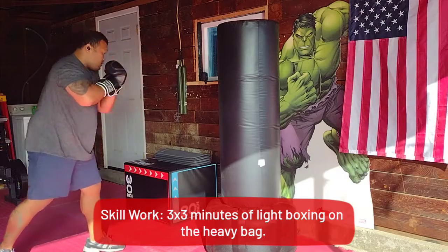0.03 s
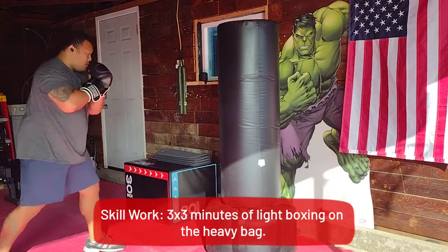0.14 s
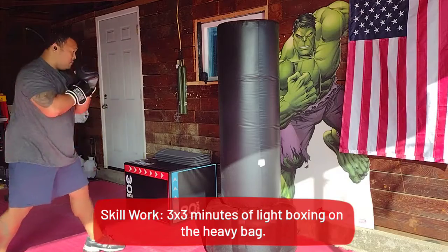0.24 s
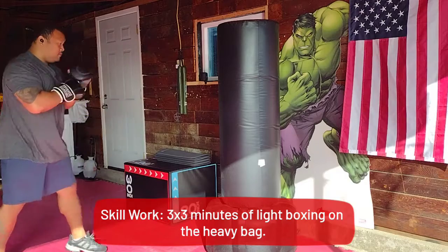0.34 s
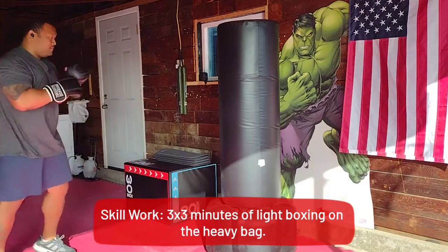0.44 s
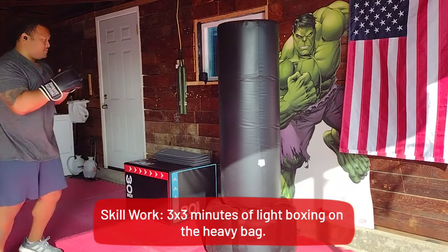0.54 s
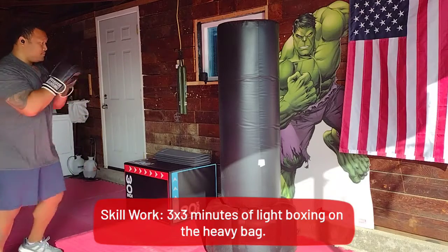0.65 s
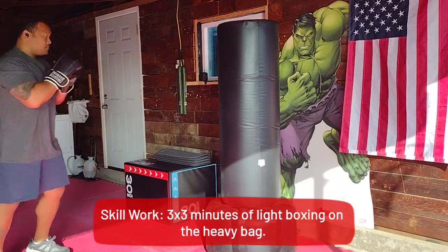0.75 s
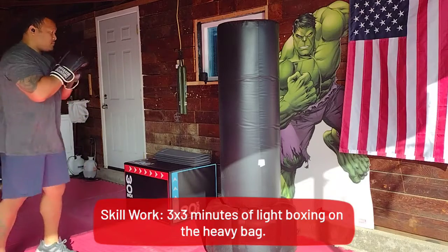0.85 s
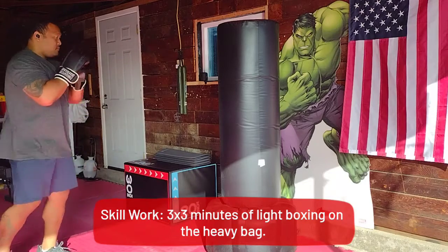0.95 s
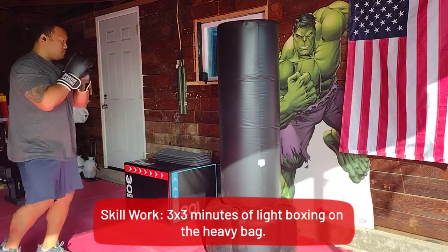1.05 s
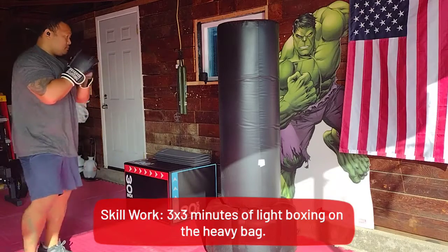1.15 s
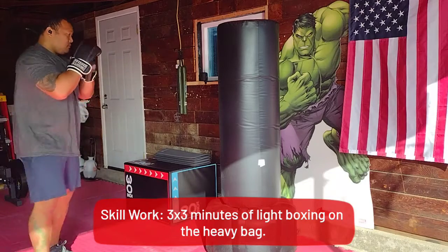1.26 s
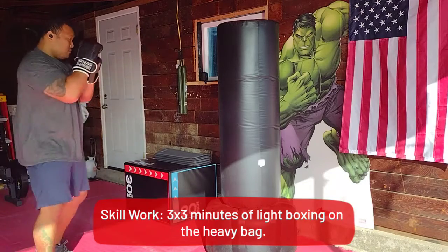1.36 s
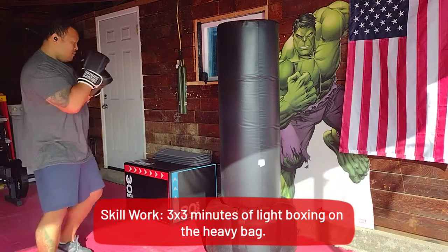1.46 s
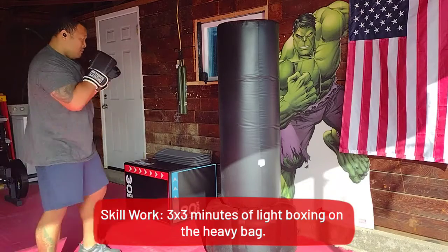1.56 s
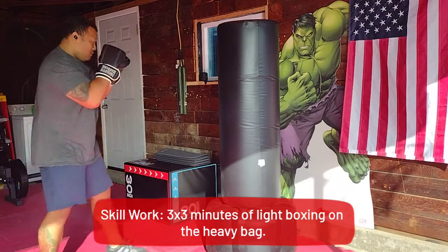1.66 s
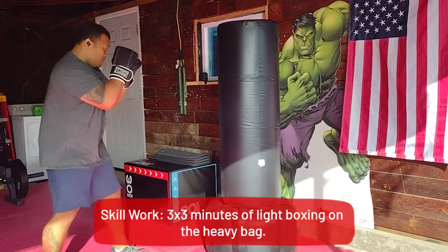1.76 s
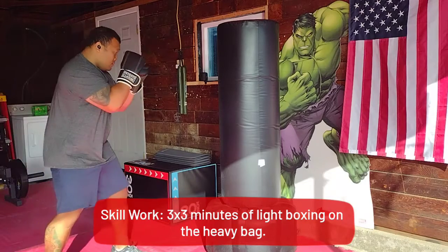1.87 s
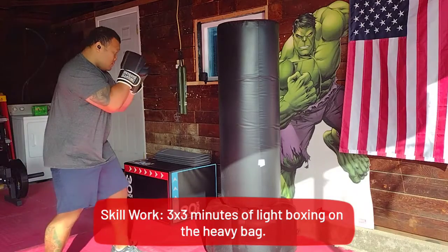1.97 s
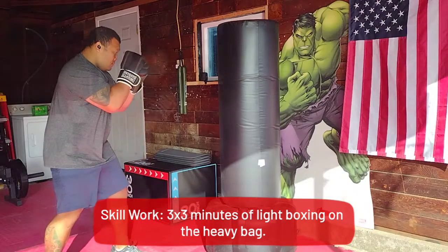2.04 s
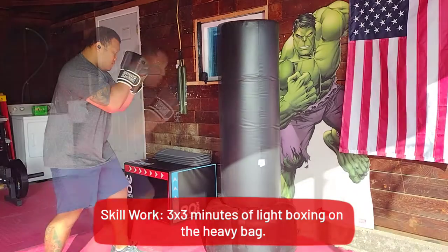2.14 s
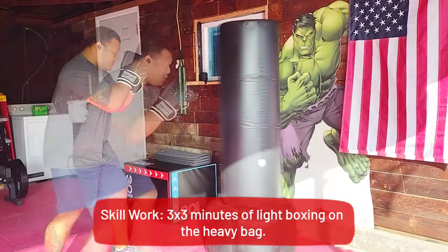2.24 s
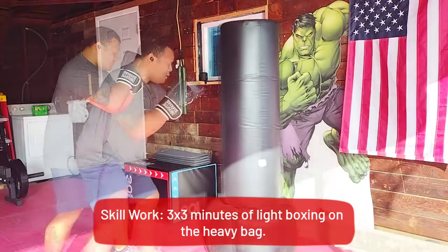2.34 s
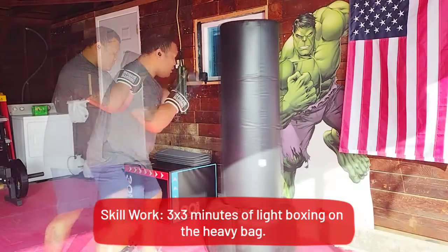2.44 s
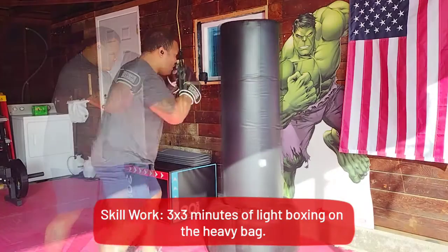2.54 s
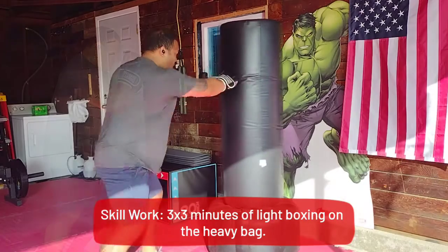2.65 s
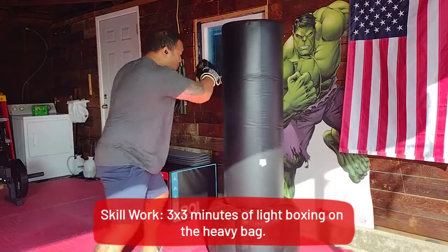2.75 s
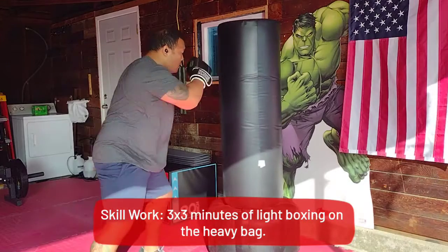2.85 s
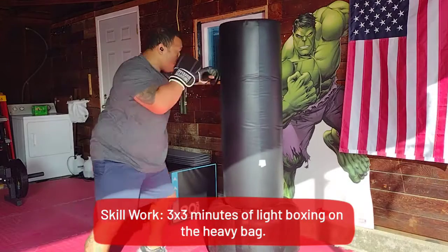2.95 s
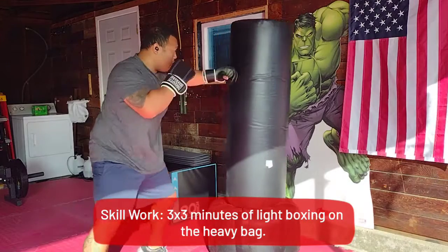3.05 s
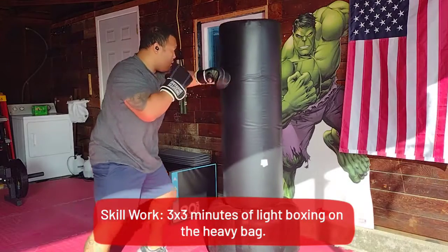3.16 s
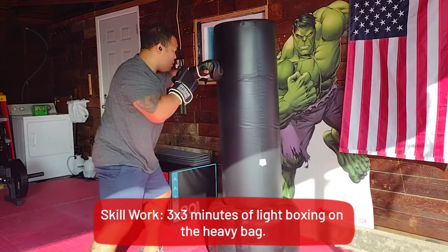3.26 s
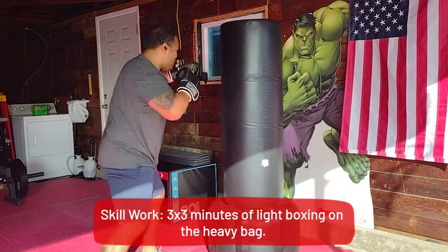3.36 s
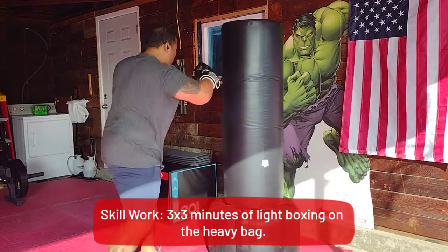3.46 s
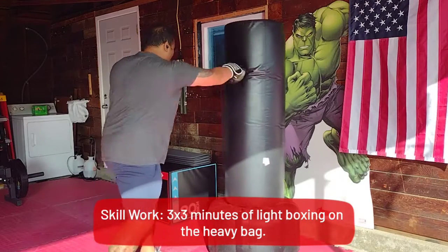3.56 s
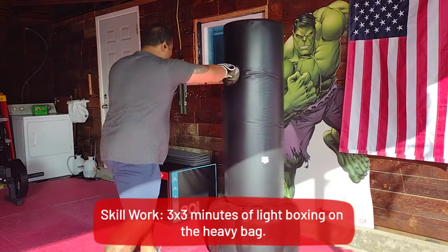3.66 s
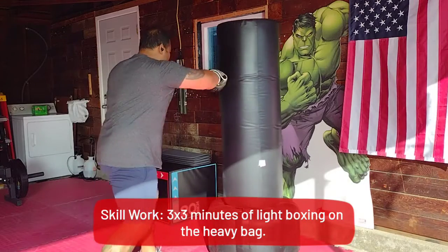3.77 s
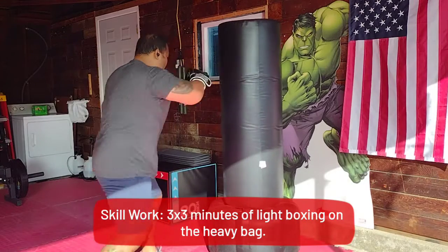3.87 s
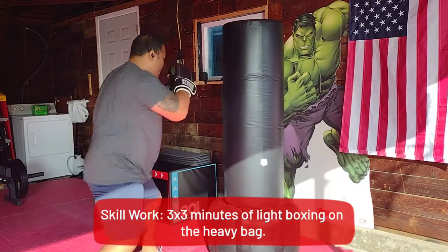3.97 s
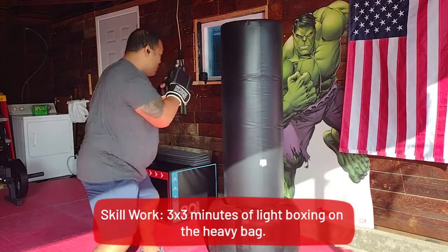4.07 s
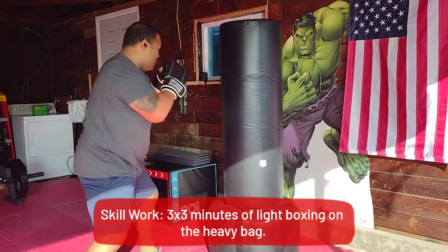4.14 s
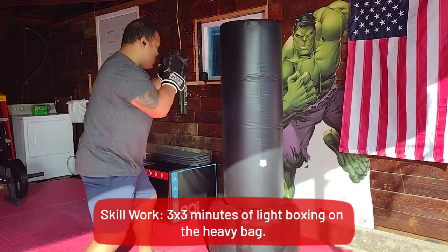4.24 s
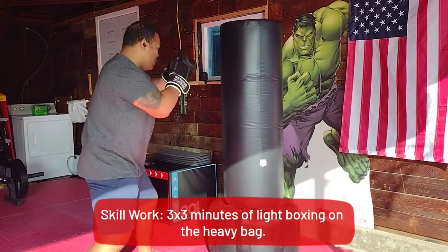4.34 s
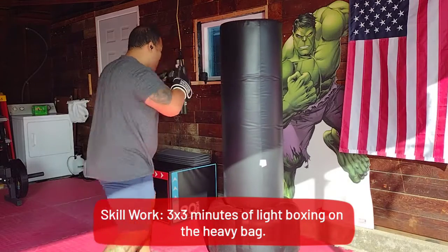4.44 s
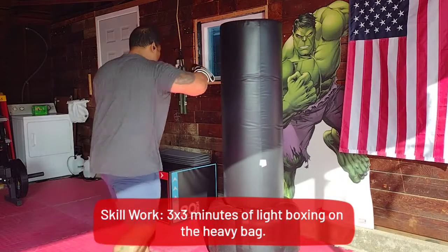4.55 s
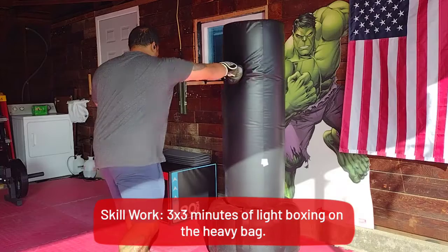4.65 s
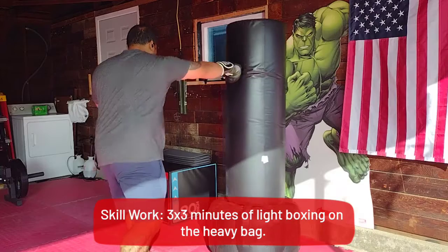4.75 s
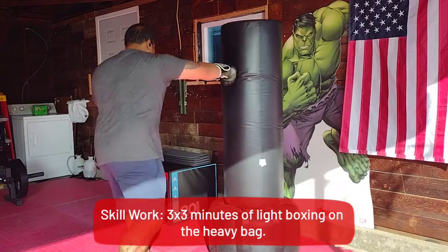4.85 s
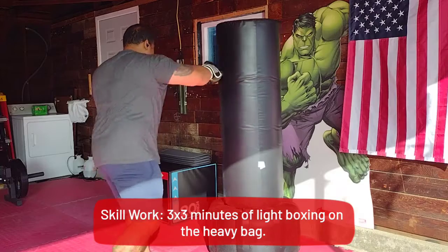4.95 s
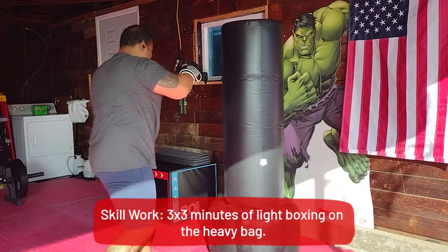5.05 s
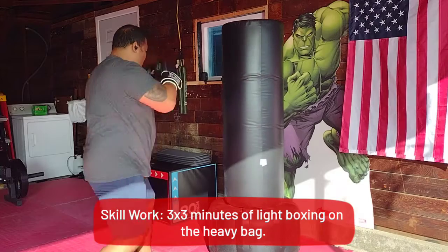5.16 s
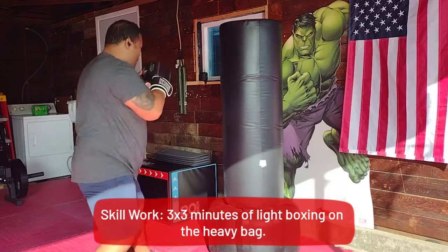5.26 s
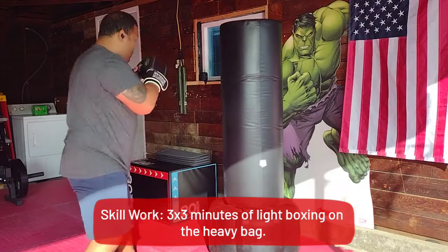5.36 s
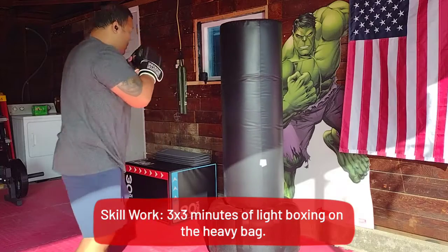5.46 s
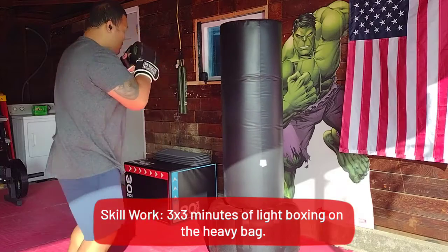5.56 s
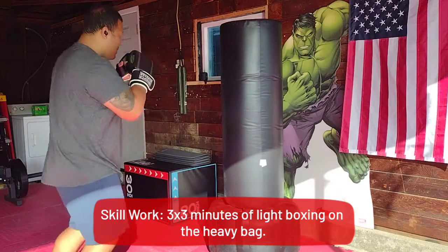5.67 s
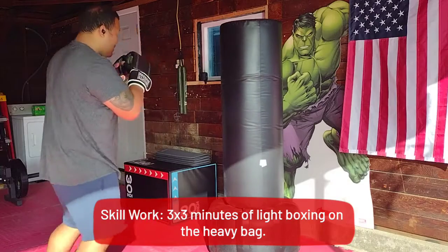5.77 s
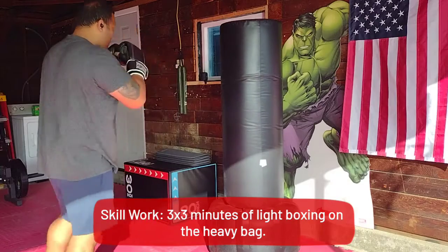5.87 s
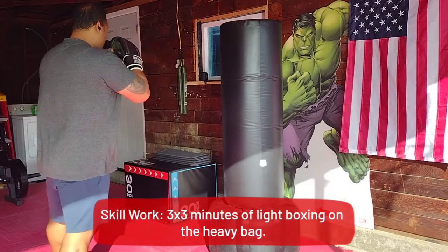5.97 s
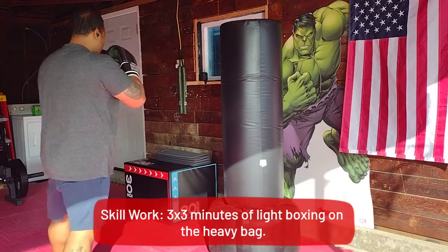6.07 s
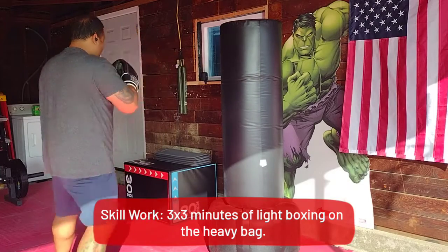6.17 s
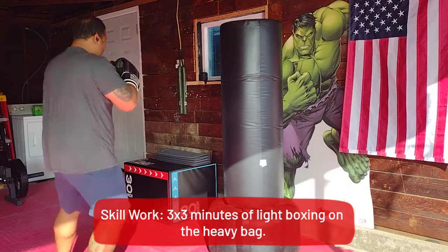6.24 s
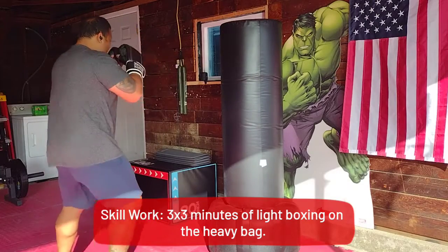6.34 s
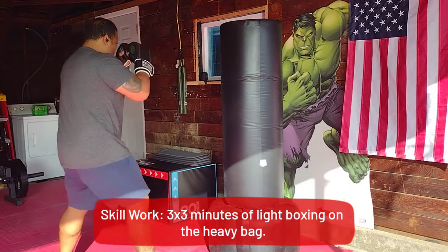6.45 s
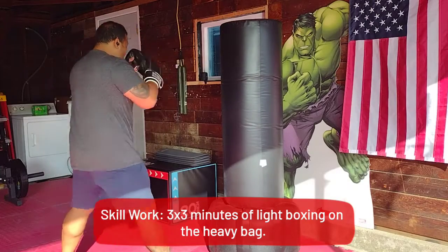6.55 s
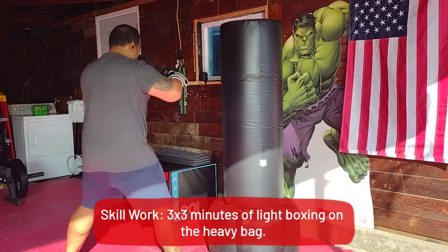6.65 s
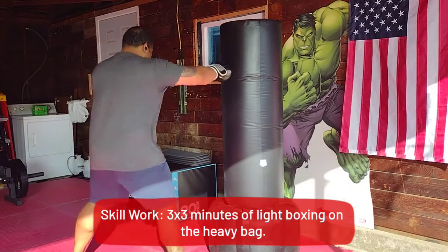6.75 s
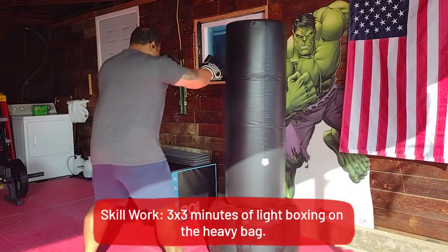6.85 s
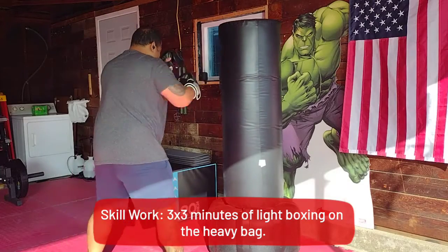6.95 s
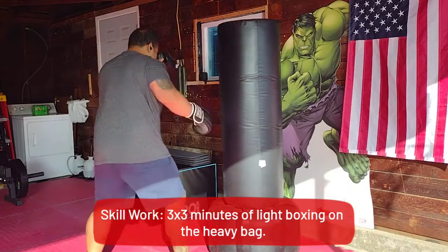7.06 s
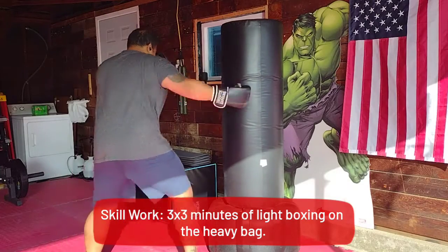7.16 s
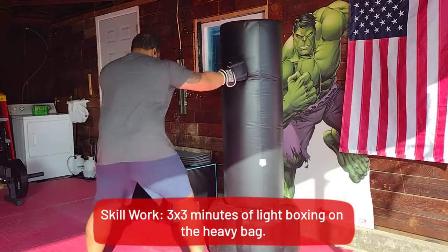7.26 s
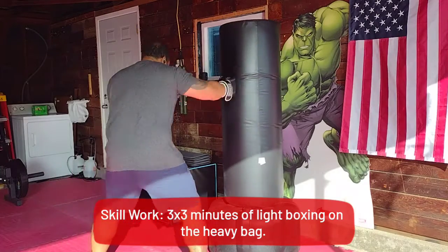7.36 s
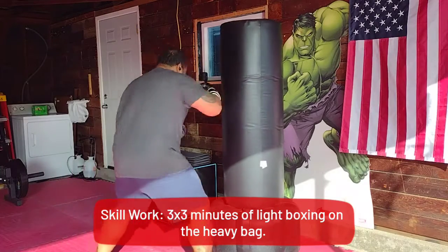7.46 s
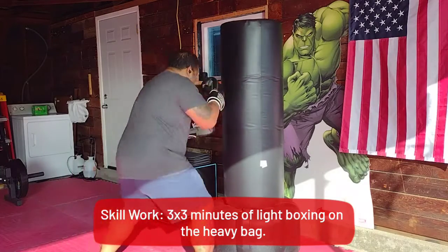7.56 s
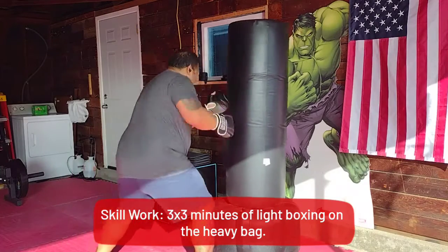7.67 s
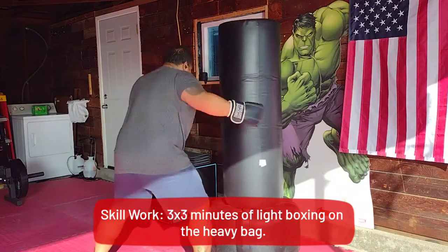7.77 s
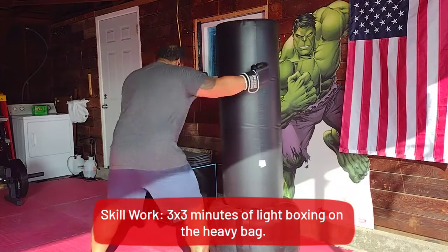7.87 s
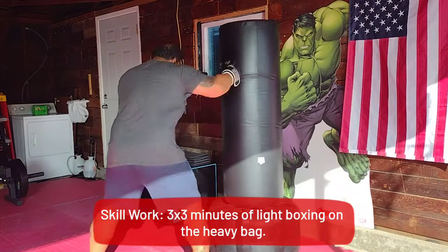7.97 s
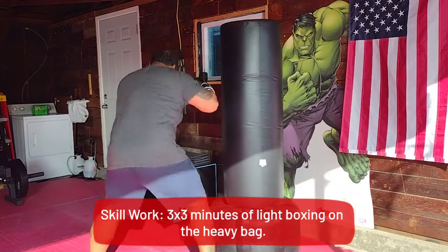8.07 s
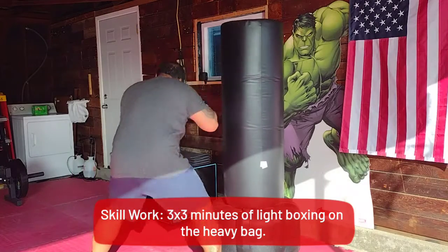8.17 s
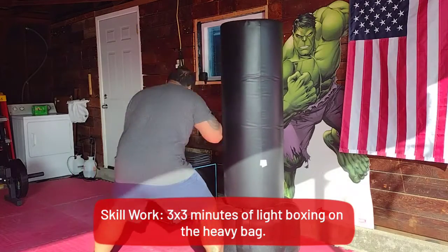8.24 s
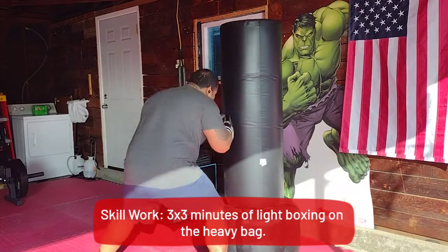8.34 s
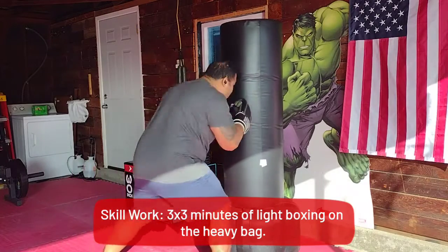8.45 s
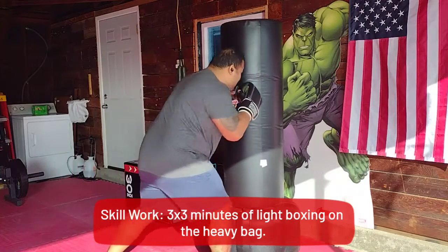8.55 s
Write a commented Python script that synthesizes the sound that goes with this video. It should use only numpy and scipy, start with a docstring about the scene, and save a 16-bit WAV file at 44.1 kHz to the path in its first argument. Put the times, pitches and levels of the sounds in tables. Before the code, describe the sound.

In a brick garage with an open door, a car fades off and small birds chirp faintly over low traffic while shoes scuff softly. A base knock comes at two seconds, then gloved punches thud on a heavy bag in loose bursts, each followed by hollow rocking knocks and small clicks. After a lull, a final flurry peaks in one heavy blow. Stereo microphone a few metres away, with short hard room reflections.

```python
"""A brick garage: gloved punches land on a free-standing heavy bag, slapping its vinyl skin and thudding
in the filling. Its plastic base rocks and knocks on the floor, and short bright clicks mark some floor
contacts. Each blow, knock or step is one impact and a chatter of small jolts through body resonances,
then the room. Shoes step and scuff on the mat (grainy noise), small birds call outside (gliding tones),
and far traffic and a car driving off (shaped noise) come through the open door."""
import sys
import numpy as np
from scipy import signal
from scipy.fft import rfft, irfft, next_fast_len
from scipy.io import wavfile
from scipy.ndimage import map_coordinates

SR = 44100
rng = np.random.default_rng(int(sys.argv[2]) if len(sys.argv) > 2 else 0)


def gain_from_db(level_db):
    """Convert decibel levels to linear amplitude factors (20 dB per decade)."""
    decades = np.asarray(level_db, float) / 20
    return 10 ** decades


def wav_out(sig):
    """Save sig, one row per channel (or a flat mono array), as 16-bit PCM at SR to the path in sys.argv[1]."""
    wavfile.write(sys.argv[1], SR, np.round(np.clip(np.atleast_2d(sig).T, -1, 1) * 32767).astype(np.int16))


N = 379701

# spectrum of the street's rush, near car included: (f/Hz, relative level per Hz/dB)
RUSH_SPECTRUM = [(200, -17), (320, 8), (450, 2.5), (1000, -0.5), (1400, -1.5), (2400, -5), (3200, -6.5),
                 (7500, -13.5), (9000, -25), (15500, -39)]
# delay of the direct sound at the left microphone, in samples; negative delays the right one
GLOVE_LAG, BASE_LAG, FEET_LAG = 1, 0, -3


def punches():
    """Gloves hit the bag: a hard impact thuds in the filling and snaps the vinyl skin."""
    # glove on bag: (t/s, thud level/dB, clack level/dB, slap level/dB, shake length/s)
    hits = [(2.828, -40.5, -54, -54, 0.14), (3.181, -41.5, -49.5, -48.5, 0.16),
            (3.723, -29.5, -45, -44, 0.1), (4.832, -34, -45, -49, 0.092), (6.966, -41, -51, -51.5, 0.15),
            (7.448, -42.5, -48, -55.5, 0.1), (7.81, -34.5, -48.5, -54, 0.11),
            (8.127, -19, -28, -45.5, 0.0082)]
    cavity_hz = 900  # the hollow that colours the clack of a glove
    contacts = [(*row, cavity_hz) for row in hits]
    return blows(contacts, cavity_db=-28.5, swell=0.00013, impact=1.2, rattle=350,
                 snap_db=12.0, wet_db=-0.5, lag=GLOVE_LAG)


def knocks():
    """Mostly the base on the floor: a hollow pitch speaks over the clack, with hardly any snap."""
    # mostly base on floor, with a few late slaps and a scuff:
    # (t/s, thud level/dB, clack level/dB, shake length/s, clack pitch f/Hz)
    contacts = [(1.973, -39, -45.5, 0.03, 396), (1.981, -33, -50, 0.076, 1480),
                (2.021, -36.5, -51.5, 0.054, 1160), (2.114, -59, -63.5, 0.18, 580),
                (2.999, -55.5, -66.5, 0.12, 1180), (3.228, -42, -51, 0.14, 606),
                (3.344, -29.5, -50, 0.043, 1160), (3.381, -34, -48, 0.042, 1160),
                (3.866, -42, -54.5, 0.019, 880), (3.916, -32.5, -45, 0.051, 1290),
                (3.958, -36.5, -48, 0.059, 1000), (4.119, -43, -55.5, 0.081, 1190),
                (4.886, -37.5, -53.5, 0.056, 595), (5.052, -41.5, -50.5, 0.037, 1300),
                (5.088, -33.5, -44.5, 0.056, 795), (5.187, -47.5, -56.5, 0.11, 1050),
                (5.263, -43.5, -60, 0.077, 990), (5.373, -51, -62, 0.12, 875),
                (7.126, -49, -58.5, 0.093, 900), (7.493, -40, -54, 0.05, 730),
                (7.515, -39.5, -44, 0.012, 1050), (7.551, -46.5, -55.5, 0.12, 900),
                (7.633, -38, -49.5, 0.073, 1080), (7.956, -50, -58.5, 0.099, 1360),
                (7.983, -35.5, -50.5, 0.079, 610), (8.158, -34, -47.5, 0.044, 650),
                (8.232, -41.5, -95, 0.087, 600), (8.275, -39.5, -55.5, 0.035, 1280),
                (8.31, -35, -50, 0.078, 780), (8.385, -40.5, -48.5, 0.038, 714)]
    return blows(with_rustle(contacts), cavity_db=8, swell=0.0013, impact=0.96, rattle=350,
                 snap_db=-12, wet_db=3.05, lag=BASE_LAG)


def ticks():
    """Short bright clicks at the onset of some floor contacts, base or foot: decaying noise bursts."""
    # clicks: (t/s, level/dB)
    clicks = [(3.874, -51), (3.959, -42.5), (4.419, -49), (5.184, -40), (5.376, -44.5), (7.634, -33.5),
              (8.31, -34.5)]
    decay_s, centre_hz, width_hz = 0.0071, 2560, 4000  # the decay is a t60
    out = np.zeros((2, N + SR))
    t = np.arange(SR // 20) / SR
    click_ring = resonances([(centre_hz, width_hz, 0)])
    for s, db in clicks:
        burst = gain_from_db(db - 60 * t / decay_s) * rng.standard_normal(len(t))
        tick = filtered(burst, lambda f: click_ring(f) ** 2)
        add_at(out, s, garage(tick, wet_db=6.5, lag=BASE_LAG))
    return out[:, :N]


def steps():
    """Feet land on the mat: a softer impact, a slower swell and a denser chatter."""
    # feet on mat: (t/s, thud level/dB, clack level/dB, shake length/s, clack pitch f/Hz)
    footfalls = [(0.202, -70, -69, 0.11, 603), (0.302, -63.5, -65, 0.078, 560),
                 (2.452, -51.5, -58.5, 0.043, 905), (4.42, -44, -60, 0.029, 900),
                 (4.439, -50, -56.5, 0.059, 1630), (4.725, -58, -68, 0.018, 1210),
                 (5.539, -49.5, -61.5, 0.038, 594), (5.574, -55.5, -62, 0.082, 1210),
                 (6.829, -51, -57.5, 0.023, 1230)]
    return blows(with_rustle(footfalls), cavity_db=8, swell=0.0023, impact=0.43, rattle=940,
                 snap_db=-12, wet_db=0.5, lag=FEET_LAG)


def scuffs():
    """Soles drag on the mat: a grainy hiss rises and falls with each stroke."""
    # shoe strokes: (t/s, length/s, level/dB)
    strokes = [(0.488, 0.2, -63.5), (0.579, 0.3, -61.5), (1.064, 0.26, -66.5), (1.347, 0.1, -67),
               (1.45, 0.092, -64), (2.092, 0.077, -55), (2.228, 0.13, -59), (2.446, 0.065, -58.5),
               (4.264, 0.12, -61), (5.065, 0.058, -55.5), (5.546, 0.047, -59), (5.775, 0.18, -58),
               (6.442, 0.03, -66.5), (6.754, 0.02, -62), (7.492, 0.1, -56), (8.14, 0.03, -45),
               (8.488, 0.054, -64.5)]
    # rubber on foam: (f/Hz, relative level per Hz/dB)
    sole = [(600, 8.5), (1500, 1), (2500, 0.5), (4000, -1), (6700, 3), (8700, -3.5), (15500, -17.5)]
    t = np.arange(N) / SR
    drag = np.zeros(N)
    for s, length, db in strokes:
        progress = np.clip((t - s) / length, 0, 1)
        drag += gain_from_db(db) * np.sin(np.pi * progress) ** 1.93
    grain = gain_from_db(0.95 * wobble(400) + 2.6 * wobble(40))
    hiss = unit(grain * tinted(sole, N))
    return garage(drag * hiss, wet_db=3.0, lag=FEET_LAG)[:, :N]


def birds():
    """Far notes blurred by a fast pitch wobble, and a clearer bird with less blur and less room."""
    # blurred notes: (t/s, length/s, first f/Hz, last f/Hz, level/dB)
    calls = [(0.945, 0.09, 5000, 2900, -66), (1.103, 0.038, 5550, 4230, -64), (1.136, 0.1, 4050, 4000, -61),
             (1.7, 0.036, 4400, 3400, -66), (1.855, 0.04, 5360, 4550, -64.5),
             (1.883, 0.062, 3970, 3440, -65)]
    # clearer notes: (t/s, length/s, first f/Hz, last f/Hz, level/dB)
    whistles = [(6.055, 0.089, 3930, 3856, -70), (6.16, 0.106, 3940, 3760, -68)]
    far = garage(bird_notes(calls, blur_hz=650), wet_db=5.0, lag=FEET_LAG)
    clear = garage(bird_notes(whistles, blur_hz=40), wet_db=-8, lag=FEET_LAG)
    return (far + clear)[:, :N]


def bird_notes(notes, blur_hz):
    """Gliding sines: each starts at once and fades, its pitch wandering by about blur_hz at most."""
    out = np.zeros(N)
    for s, length, first_hz, last_hz, db in notes:
        t = np.arange(round(length * SR)) / SR
        glide = first_hz + (last_hz - first_hz) * t / length
        pitch = glide + blur_hz * np.tanh(wobble(431, size=len(t)))
        swell = np.sin(np.pi * t / length) ** 0.13 * (1 - t / length)
        add_at(out, s, gain_from_db(db) * swell * np.sin(2 * np.pi * np.cumsum(pitch) / SR))
    return out


def street():
    """Far traffic: a low rumble and a soft rush, both noise with slightly wavering levels."""
    # traffic rumble: (f/Hz, relative level per Hz/dB)
    low_hum = [(30, -24), (65, -5), (108, -2), (168, -12), (260, -17.5), (400, -46)]
    rumble = gain_from_db(-59.5 + 0.46 * wobble(6.0)) * unit(paired(tinted(low_hum, (2, N))))
    rush = gain_from_db(-66.5 + 0.34 * wobble(48)) * unit(paired(tinted(RUSH_SPECTRUM, (2, N))))
    return rumble + rush


def departing_car():
    """A car drives off: its dull rush fades fast, its narrow bands of tyre hiss slowly."""
    # tyre hiss: (f/Hz, first level/dB)
    tyres = [(440, -76), (730, -73)]
    first_db, fade_s, top_hz, tyre_db_per_s = -62.5, 1.2, 2700, -2.5
    t = np.arange(N) / SR
    dull = filtered(tinted(RUSH_SPECTRUM, (2, N)), lambda f: 1 / (1 + (f / top_hz) ** 4))
    rush = gain_from_db(first_db) * np.exp(-t / fade_s) * unit(paired(dull))
    hiss = np.zeros((2, N))
    for hz, db in tyres:
        narrow = resonances([(hz, 0.082 * hz, 0)])
        band = unit(filtered(rng.standard_normal((2, N)), lambda f: narrow(f) ** 2))
        hiss += gain_from_db(db + 3.2 * wobble(14.0)) * band
    return rush + gain_from_db(tyre_db_per_s * t) * paired(hiss)


def blows(table, cavity_db, swell, impact, rattle, snap_db, wet_db, lag):
    """Each contact: one hard impact, then the struck body chatters in smaller jolts and settles.

    swell: rise of the chatter [s]; rattle: taps per second; cavity_db: hollow over clack [dB].
    """
    hollow_wet = 0.33  # a hollow knock faces the microphones: the share of it that the walls get
    out = np.zeros((2, N + SR))
    t = np.arange(SR // 6) / SR
    for s, thud_db, clack_db, slap_db, length, cavity_hz in table:
        length = max(length, 0.008)
        chance = rng.uniform(size=len(t))
        tap_size, grit, rub = rng.standard_normal((3, len(t)))
        # taps of limited size over a grinding contact
        jolts = (chance < rattle / SR) * np.tanh(tap_size) + 0.074 * grit
        first = -impact * (t == 0)
        body = thud(t, first, jolts, rub, swell, thud_db, length)
        body = body + clack(t, first, jolts, rub, swell, clack_db, length, cavity_hz)
        body = body + slap(t, slap_db, snap_db, length)
        knock = hollow_knock(t, first, rub, clack_db + cavity_db, cavity_hz)
        add_at(out, s, garage(body + knock, wet_db, lag, to_walls=body + hollow_wet * knock))
    return out[:, :N]


def thud(t, first, jolts, rub, swell, db, length):
    """Impact and chatter ring a set of low modes, rolled off above 1100 Hz."""
    # low modes shared by every thud, bag, base and feet: (f/Hz, width f/Hz, level/dB)
    thud_modes = [(66, 39.6, 1), (95.3, 29, 5), (161.5, 18.7, 6), (241.4, 34.6, -3), (310.6, 37.4, -1),
                  (446, 85, -7.5), (549, 34, -10.5)]
    # mode pitches vary slightly at random from contact to contact
    shifts = 1 + 0.02 * rng.standard_normal(len(thud_modes))
    low = resonances([(hz * shift, width, gain) for (hz, width, gain), shift in zip(thud_modes, shifts)])
    force = 4.54 * first + chatter(t, 0.85 * length, swell) * (jolts + 0.17 * rub)
    return ring(force, lambda f: low(f) / (1 + 1j * f / 1100) ** 2, db, length)


def clack(t, first, jolts, rub, swell, db, length, cavity_hz):
    """Impact and chatter ring stiff broad modes; a padded contact has little treble."""
    # stiff modes shared by every clack, bag, base and feet: (f/Hz, width f/Hz, level/dB)
    clack_modes = [(650, 270, 10), (1420, 975, 3.5), (2080, 744, 1)]
    edge_hz = 3340  # padded contacts roll off above this
    stiff = resonances(clack_modes)

    def padded(f):
        edge = (edge_hz ** 2 / (edge_hz ** 2 - f * f + 1j * f * 2100)) ** 2
        duller = 1 / (1 + 1j * f / (4.13 * cavity_hz)) ** 2  # a lower hollow clacks duller
        return stiff(f) * edge * duller

    settling = chatter(t, 0.91 * length, swell) * gain_from_db(-60 * t / 0.75)
    return ring(0.26 * first + settling * (jolts + 0.034 * rub), padded, db, length)


def hollow_knock(t, first, rub, db, cavity_hz):
    """A hollow resonates at its own pitch, driven by the impact and a brief rub."""
    drive_s = 0.012
    hollow = resonances([(cavity_hz, 0.38 * cavity_hz, 0)])
    force = first + 0.15 * np.exp(-t / drive_s) * rub
    return ring(force, lambda f: hollow(f) ** 2, db, drive_s)


def slap(t, db, snap_db, length):
    """Bright noise: a snap that dies in 22 ms (t60), and a rustle that lasts longer with the shake."""
    # bright noise shared by every contact, bag, base and feet: (f/Hz, relative level per Hz/dB)
    slap_spectrum = [(2500, -1.5), (4000, -4.5), (7000, -3), (8300, -8.5), (11000, -18), (15500, -11)]
    snap = gain_from_db(snap_db - 60 * t / 0.022)
    rustle = (1 - np.exp(-t / 0.0013)) * np.exp(-(t / (0.041 + 0.2 * length)) ** 2)
    return gain_from_db(db) * (snap + rustle) * tinted(slap_spectrum, len(t))


def chatter(t, hold, swell):
    """The envelope of the jolts: it swells, holds, then stops."""
    return np.exp(-(t / hold) ** 4) * (1 - np.exp(-t / swell))


def with_rustle(table):
    """Contacts with a slap level added: a longer contact has a louder bright rustle."""
    rustle_db, rustle_db_per_s = -27, 177  # relative to the clack
    return [(s, thud_db, clack_db, clack_db + rustle_db + rustle_db_per_s * length, length, hz)
            for s, thud_db, clack_db, length, hz in table]


def ring(force, response, db, length):
    """A force through a body, its whole energy set to db rms over the given length."""
    sound = filtered(force, response)
    return gain_from_db(db) * sound / np.sqrt(np.sum(sound ** 2) / (length * SR))


def resonances(modes):
    """The response of damped (f/Hz, width f/Hz, level/dB) resonances, alternating in sign."""
    def response(f):
        total = 0
        for k, (centre, width, db) in enumerate(modes):
            damping = 1j * f * width
            total = total + (-1) ** k * gain_from_db(db) * damping / (centre * centre - f * f + damping)
        return total
    return response


def garage(x, wet_db, lag, to_walls=None):
    """Direct sound plus a newly drawn noise tail; each frequency dies at its own speed."""
    # decay of the room: (f/Hz, t60 t/s)
    decay = [(60, 1), (160, 0.62), (500, 0.61), (1500, 0.77), (4000, 0.56), (10000, 0.34)]
    # hard walls return more treble than bass: (f/Hz, level/dB)
    wall_tone = [(150, -3.5), (700, -3.5), (5000, -2.5)]
    near_db, near_s = 9.5, 0.027  # extra from the nearest walls: gain at first, its t60
    count = SR // 3
    hz, t, z = signal.stft(rng.standard_normal((2, count)), SR, nperseg=512)
    t60 = along(decay, hz)
    fade = gain_from_db(along(wall_tone, hz)[:, None] - 60 * t / t60[:, None])
    scale = np.sqrt(np.mean(t60) * SR / np.log(1000) / 2)  # about the energy of a plain tail
    tail = signal.istft(z * fade, SR, nperseg=512)[1][:, :count] / scale
    tail = tail * (1 + gain_from_db(near_db - 60 * np.arange(count) / SR / near_s))
    source = x if to_walls is None else to_walls
    out = gain_from_db(wet_db) * signal.fftconvolve(source[None], paired(tail), axes=1)
    out[0, max(lag, 0):][:len(x)] += x
    out[1, max(-lag, 0):][:len(x)] += x
    return out


def paired(two):
    """Two unrelated signals to left and right: alike in the bass, apart in the treble."""
    # left-right likeness: (f/Hz, correlation)
    likeness = [(100, 0.98), (250, 0.93), (500, 0.61), (1000, 0.0093), (2000, 0.0062), (8000, 0.0045)]

    def mid_side(hz):
        turn = np.arccos(np.clip(along(likeness, hz), -1, 1)) / 2
        return np.array([np.cos(turn), np.sin(turn)])

    mid, side = filtered(two, mid_side)
    return np.array([mid + side, mid - side])


def tinted(spectrum, shape):
    """Noise of rms 1 with the given spectrum, closed below its first point."""
    closed = [(spectrum[0][0] / 2, -120)] + list(spectrum)
    return unit(filtered(rng.standard_normal(shape), lambda hz: gain_from_db(along(closed, hz))))


def filtered(x, response):
    """x times a complex response of frequency."""
    n = x.shape[-1]
    m = next_fast_len(n + 4096)
    return irfft(rfft(x, m) * response(np.fft.rfftfreq(m, 1 / SR)), m)[..., :n]


def along(points, hz):
    """(f/Hz, value) points read on a log frequency axis."""
    f, v = np.transpose(points)
    return np.interp(np.log(hz + 1), np.log(f + 1), v)


def wobble(rate, size=N):
    """A smooth random curve, rate knots a second."""
    knots = rng.standard_normal(int(size * rate / SR) + 4)
    return map_coordinates(knots, [np.arange(size) * rate / SR])


def unit(x):
    """x at rms 1."""
    return x / np.sqrt(np.mean(x ** 2) + 1e-20)


def add_at(out, s, sound):
    """Mixes a sound into out from s seconds on."""
    out[..., round(s * SR):][..., :sound.shape[-1]] += sound


def scene():
    """Bag and floor contacts, feet, birds and street."""
    bag_and_floor = punches() + knocks() + ticks()
    feet = steps() + scuffs()
    outdoors = birds() + street() + departing_car()
    return bag_and_floor + feet + outdoors


def roll_off(x):
    """The treble ends steeply here."""
    return signal.sosfilt(signal.butter(12, 15550, fs=SR, output="sos"), x)


def record(dry):
    """The microphones cut the deep bass; the left one is a little hotter in the treble."""
    def microphones(hz):
        lean_db = along([(100, 0.091), (4000, 0.48), (9000, 0.39)], hz)
        lean = gain_from_db(np.array([[1], [-1]]) * lean_db)  # left up, right down
        bass_cut = (1j * hz / (1j * hz + 50)) ** 2
        return lean * bass_cut

    mix = filtered(dry, microphones)
    return roll_off(mix)


dry = scene()
out = record(dry)
wav_out(out)
```